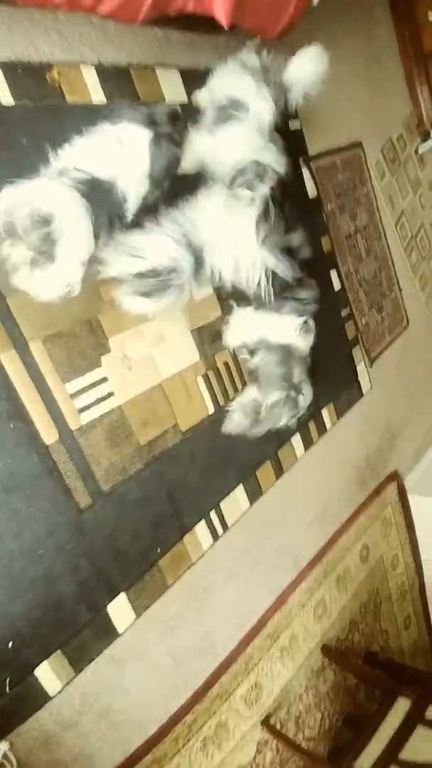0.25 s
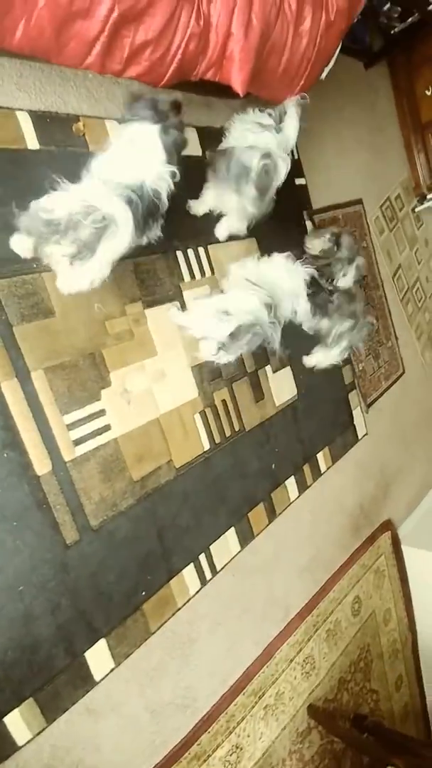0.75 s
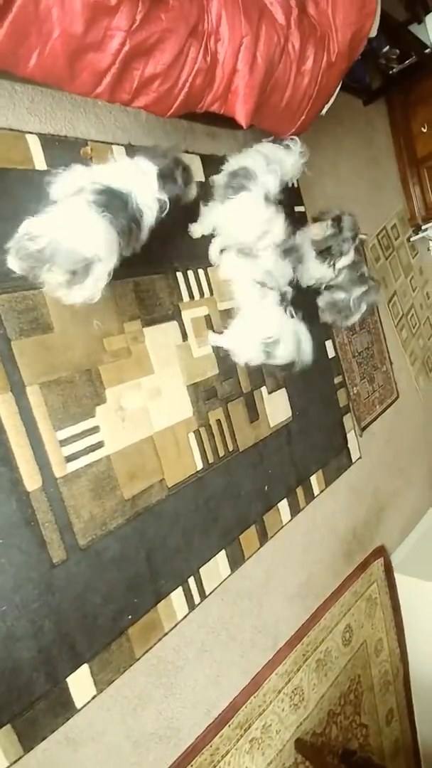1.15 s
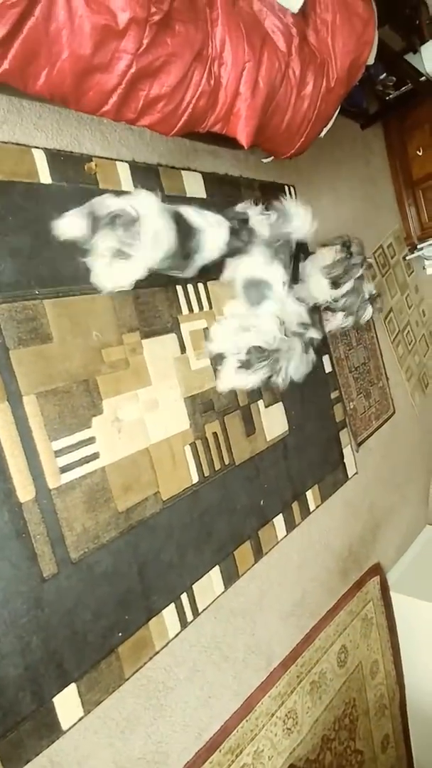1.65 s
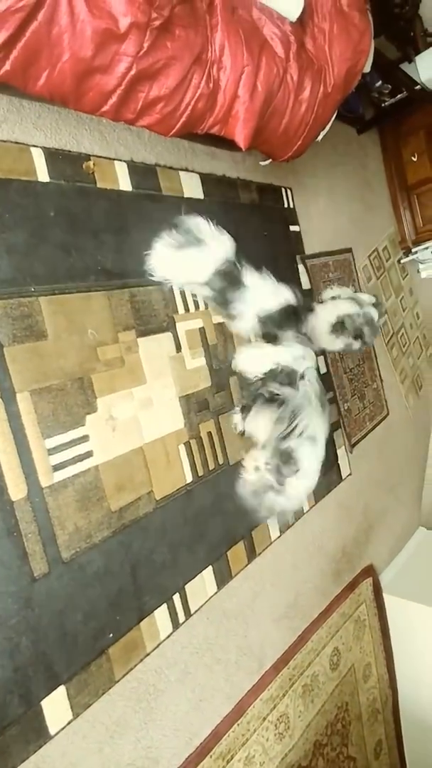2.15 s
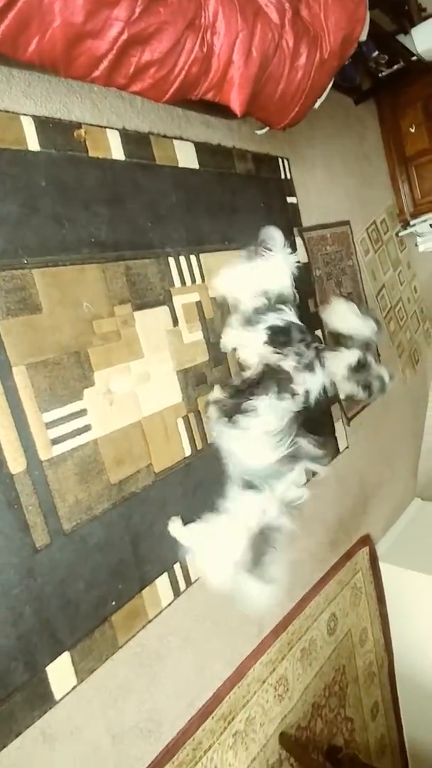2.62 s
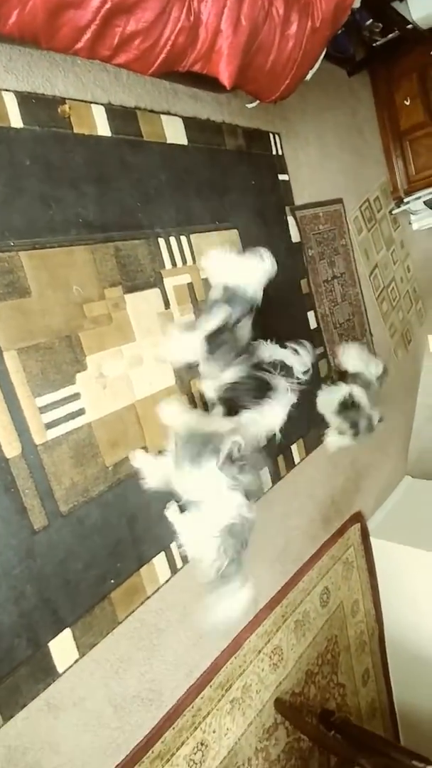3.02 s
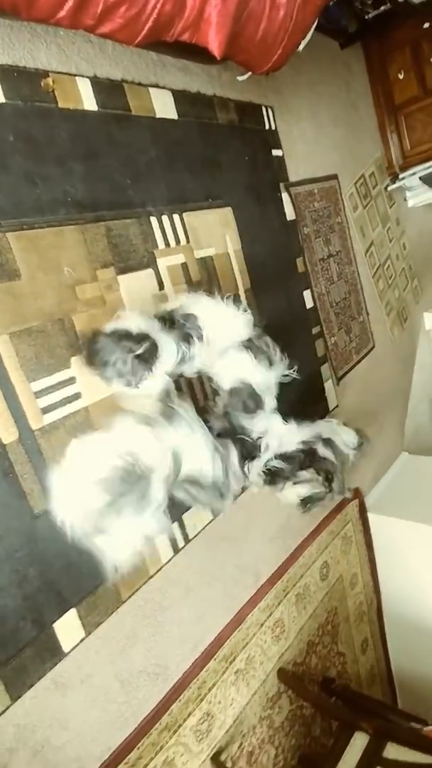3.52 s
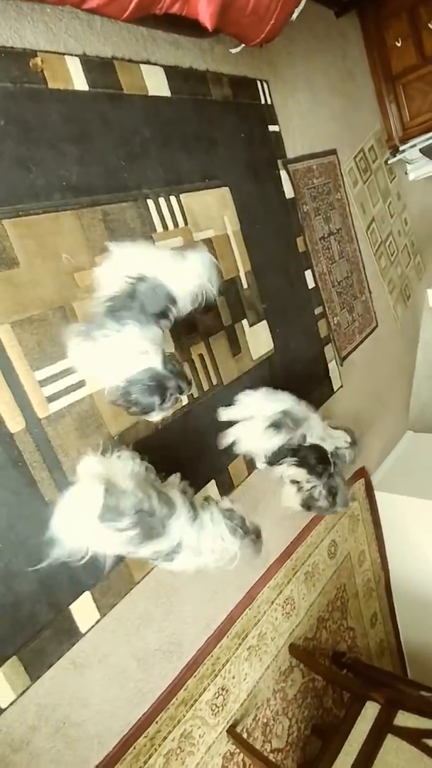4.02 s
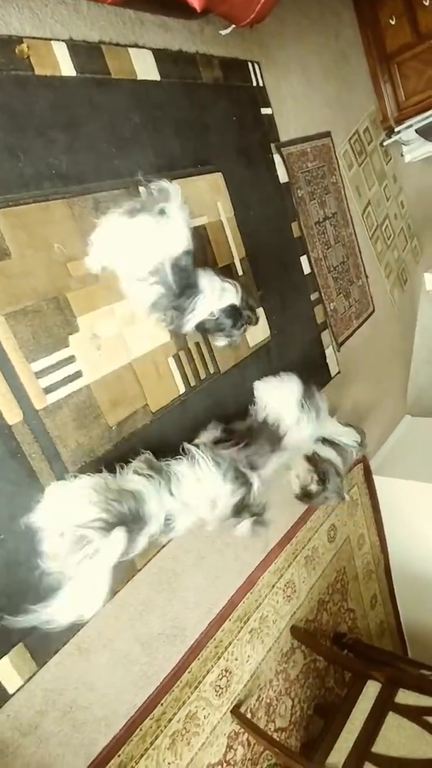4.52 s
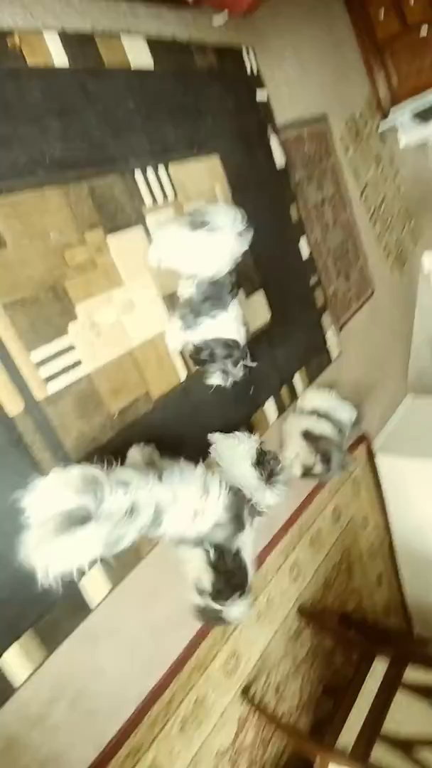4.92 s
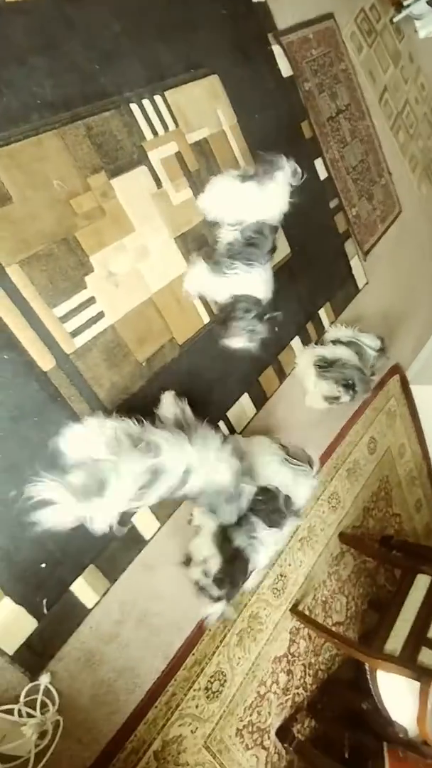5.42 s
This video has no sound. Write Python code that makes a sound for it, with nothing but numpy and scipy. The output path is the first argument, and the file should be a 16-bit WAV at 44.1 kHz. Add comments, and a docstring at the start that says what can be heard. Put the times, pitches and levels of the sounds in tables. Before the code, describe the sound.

Loud high-pitched yapping from a few small dogs wrestling in a living room, mixed with short growls, snorts, tag clinks and soft paw thuds.

```python
"""A living-room rug: small dogs play-fight with sharp yaps, one thin whine, low growls and snorts of noise.
Fold harmonics and rasping tissue excite mouth resonances in yaps and whine; pulses make the growls.
Struck modes jingle as collar tags, filtered noise rubs as fur, and short noise bursts thud as paws.
The room rings after every bark, and the barks drive the recorder into its limiter."""
import sys
import numpy as np
from scipy import signal
from scipy.fft import rfft, irfft
from scipy.io import wavfile
from scipy.ndimage import uniform_filter1d, minimum_filter1d

SR = 44100
rng = np.random.default_rng(int(sys.argv[2]) if len(sys.argv) > 2 else 0)


def master_out(mix):
    """Clip the mix to full scale and print it as 16-bit PCM to the path in sys.argv[1]."""
    frames = np.transpose(np.atleast_2d(mix))
    ceiling = np.clip(frames, -1, 1)
    pcm = np.round(ceiling * 32767).astype(np.int16)
    wavfile.write(sys.argv[1], SR, pcm)


N = 249606
TIME = np.arange(N) / SR


def gain_of(db):
    """Level law: decibels to an amplitude factor."""
    return 10 ** (np.asarray(db) / 20)


def evened(x):
    """Power normalization: scales to rms 1."""
    return x / np.sqrt(np.mean(x ** 2) + 1e-20)


def read(points, hz):
    """Interpolates a spectrum on a log-frequency axis."""
    f, value = np.transpose(points)
    return np.interp(np.log(hz + 1), np.log(f), value)


def add(mix, s, sound):
    """Superposition: mixes a sound in at time s."""
    part = mix[max(round(s * SR), 0):][:len(sound)]
    part += sound[:len(part)]


def colour(x, points, size=4096):
    """Minimum-phase filtering: a causal filter with the given spectrum."""
    log_gain = np.log(gain_of(read(points, abs(np.fft.fftfreq(size, 1 / SR)))))
    taps = np.fft.ifft(np.exp(np.conj(signal.hilbert(log_gain)))).real
    return signal.fftconvolve(x, taps[:size // 2])[:len(x)]


def wander(count, hz):
    """Low-pass noise: random motion of rms 1, weakening above hz."""
    f = np.fft.rfftfreq(count, 1 / SR)
    spectrum = rfft(rng.standard_normal(count)) / (1 + (f / hz) ** 2) ** 2
    return evened(irfft(spectrum, count))


def resonate(x, hz, width):
    """Heterodyne resonator: shifts the curve hz to zero, smooths there and shifts back."""
    turn = np.exp(2j * np.pi * np.cumsum(hz) / SR)
    r = np.exp(-np.pi * width / SR)
    return 2 * (turn * signal.lfilter([1 - r], [1, -r], x / turn)).real


def faded(x, rise, fall):
    """Linear envelope: soft start and end, in seconds."""
    t = np.arange(len(x)) / SR
    return x * np.clip(t / rise, 0, 1) * np.clip(t[::-1] / fall, 0, 1)


# spectrum of the background air: frequency [Hz], level [dB]
AIR_SPECTRUM = [(25, -10.5), (60, -4), (200, -8.5), (2000, -7), (16000, -26.5)]


def background_air():
    """Stationary noise: filtered random pressure makes a faint steady hiss."""
    return gain_of(-66.0) * evened(colour(rng.standard_normal(N), AIR_SPECTRUM))


# reverberation time of the room: frequency [Hz], t60 [s]
ROOM_DECAY = [(250, 0.32), (1700, 0.35), (4500, 0.23), (15000, 0.095)]


def room(x, wet_db):
    """Reverberation: dense reflections die at each band's own speed; nominal total power is kept."""
    taps = rng.choice([-1., 1.], SR // 2) * (rng.random(SR // 2) < 3000 / SR)
    taps[:SR // 300] = 0  # gap before the first reflection
    hz, t, z = signal.stft(taps, SR, nperseg=256)
    decay = gain_of(-60 * t / read(ROOM_DECAY, hz)[:, None])
    tail = signal.istft(z * decay, SR, nperseg=256)[1]
    wet = gain_of(wet_db)
    reflections = signal.fftconvolve(x, tail / np.linalg.norm(tail))[:N]
    return (x + wet * reflections) / np.hypot(1, wet)


# bouts of wrestling: start_s [s], length_s [s], vigour_db [dB]
WRESTLING_BOUTS = [(-.15, 1.17, 3.5), (0.882, 0.65, 6.5), (1.793, 0.97, 4), (2.587, 1.28, 0),
                   (3.279, 0.23, 15), (3.696, 0.16, 13.5), (3.797, 0.34, -2.5), (4.475, 0.64, 8),
                   (5.33, 0.33, 9)]
LULL_DB = -11  # stirring that goes on throughout, also between the bouts


def wrestling():
    """Shared envelope: every bout swells and subsides in one half-sine arch."""
    arches = (gain_of(db) * np.sin(np.pi * np.clip((TIME - s) / length, 0, 1))
              for s, length, db in WRESTLING_BOUTS)
    return gain_of(LULL_DB) + sum(arches)


# spectra of rubbed fur and of paws on the floor: frequency [Hz], level [dB]
FUR_SPECTRUM = [(200, 0.5), (900, 13.5), (4000, -5.5), (5800, 4.5), (11000, 9), (15000, -22.5)]
PAW_SPECTRUM = [(25, -16), (70, 0), (190, 4), (400, -2), (2000, -30), (6000, -52)]


def scuffle(tussle, fur_db=-53, paw_db=-47, steps_per_s=28):
    """Friction and impact: fur and claws rub the rug in short strokes; paws thud as brief bursts."""
    strokes = gain_of(4.5 * wander(N, 35))
    rub = colour(rng.standard_normal(N), FUR_SPECTRUM) * strokes
    steps = (rng.random(N) < steps_per_s / SR) * rng.uniform(0.11, 1, N)
    t = np.arange(SR // 10) / SR
    thud = rng.standard_normal(len(t)) * np.exp(-t / 0.0054)
    paws = colour(signal.fftconvolve(steps, thud)[:N], PAW_SPECTRUM)
    return gain_of(fur_db) * tussle * evened(rub) + gain_of(paw_db) * tussle ** 0.65 * evened(paws)


# modes of the metal tags, before random spread: frequency_hz [Hz], level_db [dB], t60_s [s]
TAG_MODES = [(5650, -16.5, 0.05), (10310, -0.5, 0.037), (11480, 0, 0.028), (11930, -3.5, 0.079),
             (14700, -18.5, 0.033), (15450, -7, .08)]


def clash(tick=0.15, spread_db=6, detune=0.024, bounce_s=0.0096, bounce_db=-7):
    """Modal ringing: the contact point weights the struck tag's modes, and the tag chatters."""
    t = np.arange(SR // 6) / SR
    hz, db, t60 = np.transpose(TAG_MODES)[:, :, None]
    weight, phase, offset = rng.standard_normal((3, len(TAG_MODES), 1))
    decay = gain_of(db + spread_db * weight - 60 * t / t60)
    ring = (decay * np.sin(2 * np.pi * (hz * (1 + detune * offset) * t + phase))).sum(0)
    contact = np.diff(rng.standard_normal(len(t) + 2), n=2) / 2 * np.exp(-t / 0.0051)
    strike = ring / abs(ring).max() + tick * contact
    out = strike.copy()
    for k, delay in enumerate(np.cumsum(rng.exponential(bounce_s, size=3)), 1):
        add(out, delay, gain_of(bounce_db * k) * strike)
    return out


# loud clashes of the collar tags: start_s [s], level_db before the common trim [dB]
TAG_CLASHES = [(.502, -16.5), (0.779, -18.5), (2.228, -18), (2.265, -11), (2.678, -21.5), (2.762, -16.5),
               (2.795, -14), (2.883, -16.5), (2.907, -13.5), (2.931, -16), (3.295, -19), (3.342, -19),
               (3.407, -8), (3.43, -16), (4.71, -14)]


def tags(tussle, clash_db=-3, rattle_db=-38, rattles_per_s=45):
    """Random impacts: loud clashes, and a light rattle whose level follows the tussle."""
    out = np.zeros(N)
    for s, db in TAG_CLASHES:
        add(out, s, gain_of(db + clash_db) * clash())
    for at in np.flatnonzero(rng.random(N) < rattles_per_s / SR):
        strength = gain_of(rattle_db + 4.1 * rng.standard_normal())
        add(out, at / SR, tussle[at] * strength * clash())
    return out


# spectrum of a snort: frequency [Hz], level [dB]
SNORT_SPECTRUM = [(40, -34), (130, -10), (750, -5.5), (1450, 7.5), (2200, -9.5), (3600, -11), (6000, -26),
                  (10000, -19.5), (15000, -32)]


def snort(length, db):
    """Turbulence: a fluttering puff of air through a short muzzle."""
    n = int(length * SR)
    puff = rng.standard_normal(n) * (1 + 0.24 * wander(n, 63))
    return faded(gain_of(db) * evened(colour(puff, SNORT_SPECTRUM)), 0.011, 0.071)


# snorts and huffs of air: start_s [s], length_s [s], level_db before the fades [dB]
SNORT_EVENTS = [(.37, 0.15, -25), (1.939, 0.083, -38.5), (2.324, 0.17, -23.5), (3.715, 0.066, -24.5),
                (4.273, 0.053, -38), (4.508, 0.23, -20.5)]


def snorts(voices):
    """Superposition of the puffs of air."""
    for s, length, db in SNORT_EVENTS:
        add(voices, s, snort(length, db))


# spectra of the chest hum and of the snarling mouth: frequency [Hz], level [dB]
CHEST_SPECTRUM = [(60, -39.5), (130, -12.5), (190, 1), (280, -11.5), (450, -16), (2000, -78)]
SNARL_SPECTRUM = [(200, -26), (500, -13.5), (720, -0.5), (1080, 2.5), (1400, -9.5), (1750, -14.5),
                  (2200, -32), (2700, -33), (2900, -24.5), (3150, -43), (6000, -49.5)]
SNARL_HZ = 1100  # resonance of the bared teeth at the highest signed pitch; it moves with the pitch


def growl(level, hz, snarl_db, jitter=.012, shimmer=.2, breath=.12):
    """Source and filter: pulses hum in the chest and rattle through the bared teeth."""
    n = len(hz)
    turns = np.cumsum(hz * (1 + jitter * wander(n, 100))) / SR
    pulses = evened(np.diff(np.floor(turns), prepend=0) * (1 + shimmer * wander(n, 150)))
    puffs = evened(np.exp(-(turns % 1) / 0.41) * rng.standard_normal(n))
    hum = faded(evened(colour(pulses - pulses.mean(), CHEST_SPECTRUM)), 0.018, .01)
    rattle = pulses + breath * puffs
    teeth = resonate(rattle, SNARL_HZ * hz / hz.max(), 200)
    snarl = evened(colour(rattle + 1.75 * teeth, SNARL_SPECTRUM))
    return faded(level * (hum + gain_of(snarl_db) * snarl), 0.0022, 0.0057)


SWELL_DB, EBB_DB = 7, 11.5  # a growl starts and ends this far below its crest
# share of the pitch lost per dB below the crest; beyond 2.6 dB the pulses run backwards, ever faster
PITCH_PER_DB = 0.38


def growl_gesture(length, crest, effort_db, top_hz):
    """Coupled effort: level swells to a crest and ebbs away, and signed pitch follows it."""
    u = np.linspace(0, 1, int(length * SR))
    crest = np.clip(crest, .01, .99)
    swell = SWELL_DB * (1 - u / crest) ** 2
    ebb = EBB_DB * ((u - crest) / (1 - crest)) ** 2
    below_db = np.where(u < crest, swell, ebb)
    return gain_of(effort_db - below_db), top_hz * (1 - PITCH_PER_DB * below_db)


# growls: start_s [s], length_s [s], crest place [0-1], effort_db at the crest [dB],
# pitch_hz at the crest [Hz], snarl_db of the open mouth against the hum [dB]
GROWL_EVENTS = [ (0.471, 0.095, 0.94, -24, 209.2, 4), (0.946, 0.12, 0.88, -32, 179.5, -1),
                (1.884, .11, 0.2, -33, 197, -6.5), (2.18, 0.16, 0.92, -30, 189.7, -5),
                (2.95, 0.12, 0.65, -37.5, 176, -7.5), (3.39, 0.26, 0.55, -30, 185.2, -3),
                (3.721, 0.088, 0.21, -35, 165.4, 0.5), (3.85, 0.045, 0.44, -41, 183.4, 7.5),
                (3.908, 0.35, .22, -23, 203, 3), (4.442, 0.064, 0.93, -28, 196.4, -22)]


def growls(voices):
    """Superposition of the growls."""
    for s, *gesture, snarl_db in GROWL_EVENTS:
        add(voices, s, growl(*growl_gesture(*gesture), snarl_db))


# fixed colour of the throat: frequency [Hz], level [dB]
THROAT_SPECTRUM = [(100, -24), (400, -16), (520, -9.5), (680, 0), (1050, -3), (1480, -1.5), (1750, -11.5),
                   (2200, -16.5), (2700, -29.5), (3400, -28.5), (9000, -29.5), (15000, -40.5)]
JITTER, ROUGH_JITTER, WOBBLE = .009, .024, .055  # pitch shares: always, and more with roughness (two)
SHIMMER_DB, HISS = 2.3, .4  # level unsteadiness [dB rms]; air in the rasp [share]
FOLD_TILT = .75  # the fold harmonics fall with this power of their number
LIPS_PART_S, LIPS_HZ = 0.018, 1650  # the parting lips muffle above LIPS_HZ; time constant [s]


def bark_or_whine(level, hz, rough, mouth_hz, upper_hz, upper_db, rasp_hz=150, rasp_depth=1.0,
                  mouth_width=300, mouth_db=11, upper_width=190):
    """Source and filter: squeaking folds and rasping tissue excite two moving mouth resonances."""
    n = len(hz)
    quiver = 1 + 0.082 * wander(n, 40)
    unsteady = (JITTER + ROUGH_JITTER * rough) * wander(n, 197.0) + WOBBLE * rough * wander(n, 51.8)
    turns = np.cumsum(hz * (1 + unsteady)) / SR
    folds = evened(sum(np.cos(2 * np.pi * k * turns) / k ** FOLD_TILT for k in np.arange(1, 5)))
    # loose tissue above the folds flaps unevenly: it chops the tone; each flap is a slap and a puff of air
    flaps = np.cumsum(rasp_hz * (1 + 0.298 * wander(n, 83.5))) / SR
    chop = 1 + rasp_depth * rough * np.cos(2 * np.pi * flaps)
    hits = evened(np.diff(np.floor(flaps), prepend=0) * rng.uniform(.5, 1, n))
    slaps = uniform_filter1d(hits, size=7)
    puffs = evened(np.exp(-2 * (flaps % 1)) * rng.standard_normal(n))
    rasp = slaps + HISS * puffs

    def throat(x):
        """Formant: the main mouth resonance on top of the fixed colour of the throat."""
        mouth = resonate(x, mouth_hz * quiver, mouth_width)
        return evened(colour(x + gain_of(mouth_db) * mouth, THROAT_SPECTRUM))

    rasp_share = rough ** 1.65
    voice = evened((1 - rasp_share) * throat(folds * chop) + rasp_share * throat(rasp))
    upper = resonate(resonate(rasp, upper_hz, upper_width), upper_hz, upper_width)
    voice = voice + gain_of(upper_db) * evened(upper)
    muffled = signal.sosfiltfilt(signal.butter(2, LIPS_HZ, fs=SR, output="sos"), voice)
    voice = voice + (muffled - voice) * np.exp(-TIME[:n] / LIPS_PART_S)
    # level out the voice over 16 ms, so that mainly the gesture sets its envelope
    loudness = np.sqrt(uniform_filter1d(voice ** 2, size=700) + 1e-9)
    return faded(level * gain_of(SHIMMER_DB * wander(n, 45)) * voice / loudness, .002, .008)


# cracks of the voice, where pitch dips and roughness rises: centre_s [s], length_s [s]
VOICE_CRACKS = [(.392, 0.018), (1.658, .03), (2.424, 0.034), (3.197, .025), (4.674, .025), (5.434, .025)]
CRACK_DROP, CRACK_ROUGH = .28, .6  # share of pitch lost, roughness added
BREAK_S = 0.0051  # the voice flips from one pitch to the other this quickly
SAG, RECOVER_S = 0.1509, 0.02184  # it lands flat by this share, then pulls up
FRAY_PER_S = 1.3  # the held note grows rougher as the air runs out
MOUTH_SHUT_HZ, MOUTH_OPEN_S = 982, 0.13  # the jaw drops around the break, taking this long
MOUTH_CLOSE = 0.15  # the resonance sinks again by this share towards the end


def voice_gesture(s, length, attack, effort_db, fall_db, from_hz, to_hz, break_s, held_hz,
                  opening_rough, held_rough, open_mouth_hz, upper_from_hz, upper_to_hz):
    """Register break: a glide flips to a held note as the jaw drops; it may crack, and fades and frays."""
    t = np.arange(0, length, 1 / SR)
    broken = .5 + .5 * np.tanh((t - break_s) / BREAK_S)
    since = np.maximum(t - break_s, 0)
    crack = sum(np.exp(-(2 * (s + t - at) / span) ** 2) for at, span in VOICE_CRACKS)
    level = np.minimum(t / attack, 1) ** 2 * gain_of(effort_db - fall_db * t / length)
    opening_hz = np.interp(t, [0, break_s], [from_hz, to_hz])
    landed_hz = held_hz * (1 - SAG * np.exp(-since / RECOVER_S))
    hz = ((1 - broken) * opening_hz + broken * landed_hz) * (1 - CRACK_DROP * crack)
    rough = (1 - broken) * opening_rough + broken * (held_rough + FRAY_PER_S * since)
    rough = np.clip(rough + CRACK_ROUGH * crack, 0, 1)
    jaw = np.clip(.5 + (t - break_s) / MOUTH_OPEN_S, 0, 1)
    mouth_hz = MOUTH_SHUT_HZ + jaw * (open_mouth_hz - MOUTH_SHUT_HZ)
    mouth_hz = mouth_hz * (1 - MOUTH_CLOSE * (t / length) ** 2)
    return level, hz, rough, mouth_hz, np.linspace(upper_from_hz, upper_to_hz, len(t))


# barks, and one thin whine at 0.113 s, perhaps a second dog's:
# start_s [s], length_s [s], attack_s [s], effort_db [dB], fall_db by the end [dB],
# glide from_hz [Hz], to_hz [Hz], break_s after the start [s], held pitch_hz before the sag [Hz],
# opening roughness [0-1], held roughness before fraying [0-1], open_mouth_hz before closing [Hz],
# upper resonance from_hz [Hz], to_hz [Hz], upper level_db against the voice [dB]
BARKS_AND_WHINE = [ (0, 0.043, 0.00079, -5, 4, 790, 787, .034, 783, 0.8, 0.82, 1560, 2380, 2540, -16),
                   (0.055, 0.16, 0.0095, 5, 21.5, 1080, 798, 0.035, 666.7, 0.31, 0.41, 1180, 2700, 2390, -30.5),
                   (0.113, .15, 0.027, -7, 9.5, 1060, 1092, 0.016, 1107, .2, 0.07, 1125, 2680, 2360, -19),
                   (0.302, .18, .01, -1, 15.5, 1100, 844, .019, 730.6, 0.21, 0.15, 1280, 2510, 2980, -27.5),
                   (.554, .18, 0.014, -2, 14, 700, 985, 0.07, 1032, 0.46, .6, 1160, 2260, 2470, -28),
                   (1.059, 0.23, 0.02, 0.5, 18, 740, 898.4, 0.039, 832.4, 0.51, 0.33, 984, 2040, 2360, -27),
                   (1.307, .18, 0.036, 1.5, 11, 980, 850, .076, 656, 0.48, 0.53, 1220, 2570, 2340, -26),
                   (1.564, .21, 0.005, 0, 21, 620, 993.6, .024, 736, 0.73, 0.46, 1350, 2670, 2760, -26.5),
                   (2.306, 0.19, 0.034, -2, 11, 490, 429.4, .044, 705.6, 0.46, 0.12, 1367, 1770, 2000, -22),
                   (3.066, .27, .014, -.5, 16.5, 960, 1085, 0.069, 741.4, 0.47, 0.53, 1275, 2930, 2800, -33),
                   (4.471, .25, 0.044, -2.5, 5.5, 1120, 985, .122, 768, 0.59, 0.29, 1500, 3440, 2660, -31.5),
                   (4.931, .22, 0.006, -1.5, 17, 1040, 882, 0.057, 710, 0.66, 0.53, 1180, 2860, 2130, -26),
                   (5.327, .17, 0.0045, 2.5, 18, 930, 1059, .046, 716, 0.67, 0.46, 1270, 2350, 2650, -31),
                   (5.493, 0.056, 0.0097, -3, -2, 790, 1006, 0.038, 1059, 0.44, 0.43, 1120, 3000, 2500, -21.5),
                   (5.603, 0.049, 0.0043, -3.5, 8.5, 1080, 678, 0.023, 745, 0.56, 0.64, 1000, 2570, 2760, -17.5)]


def barks_and_whine(voices):
    """Superposition of the barks and the one thin whine."""
    for s, *gesture, upper_db in BARKS_AND_WHINE:
        add(voices, s, bark_or_whine(*voice_gesture(s, *gesture), upper_db))


def scene():
    """Superposition: the dogs and their collars in the living room."""
    air = background_air()
    tussle = wrestling()
    contacts = scuffle(tussle) + tags(tussle)
    voices = np.zeros(N)
    snorts(voices)
    growls(voices)
    barks_and_whine(voices)
    return (room(voices, wet_db=-2.0) + room(contacts, wet_db=-2.0) + air)[None]


EDGE_HZ = 15950  # upper band limit of the recorder


def record(dry, recovery_db=75, lopsided=0.084):
    """Dynamic compression: gain ducks fast and recovers slowly; a look-ahead limiter and band limit follow."""
    over_db = 20 * np.log10(np.maximum(abs(dry[0]), 1))
    fall = TIME * recovery_db  # dB per second, before the 0.54 compression share
    duck_db = np.maximum.accumulate(over_db + fall) - fall
    x = dry[0] / gain_of(0.54 * uniform_filter1d(duck_db, size=200))
    x = x + lopsided * np.tanh(x) ** 2  # slight overload: difference tones under the loudest barks
    hold = minimum_filter1d(1 / np.maximum(abs(x), 1), size=61)
    x = x * uniform_filter1d(uniform_filter1d(hold, size=31), size=31)
    x = signal.sosfilt(signal.butter(1, 30, "high", fs=SR, output="sos"), x)
    band_limit = signal.firwin(301, EDGE_HZ, window=("kaiser", 8), fs=SR)
    return signal.oaconvolve(x, band_limit, "same")[None]


dry = scene()
out = record(dry)
master_out(out)
```